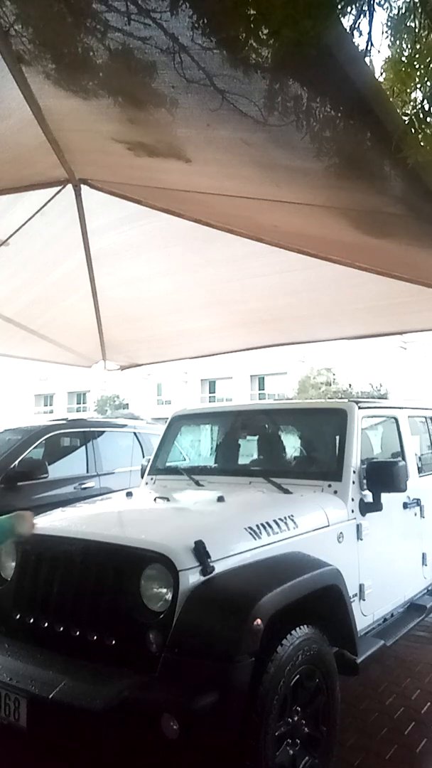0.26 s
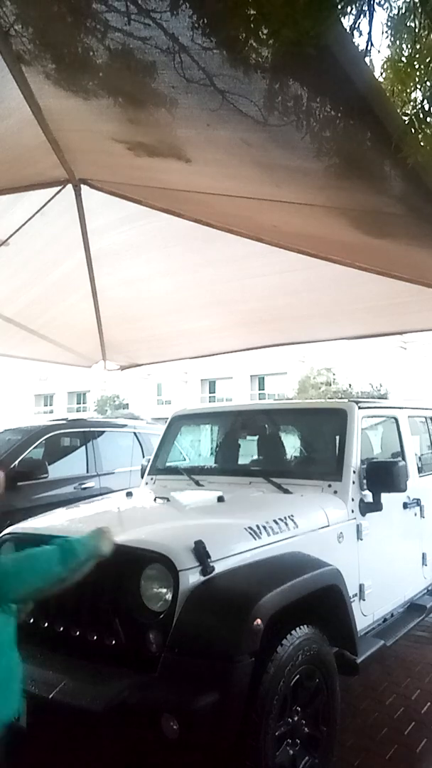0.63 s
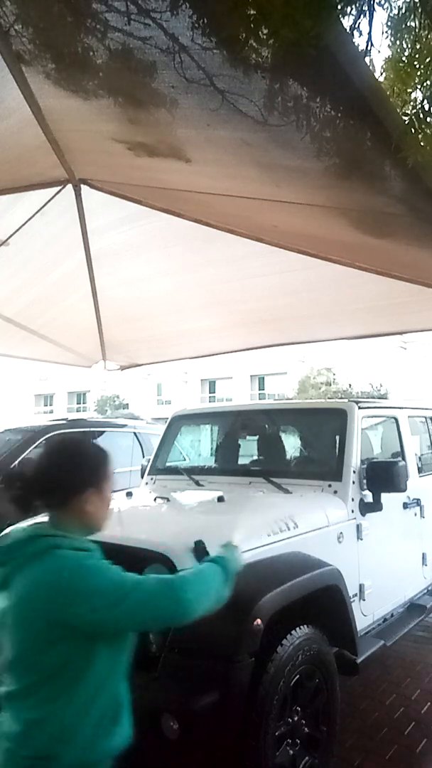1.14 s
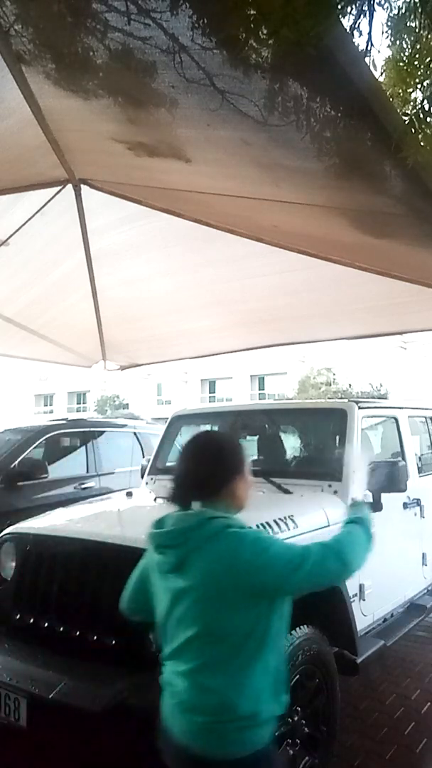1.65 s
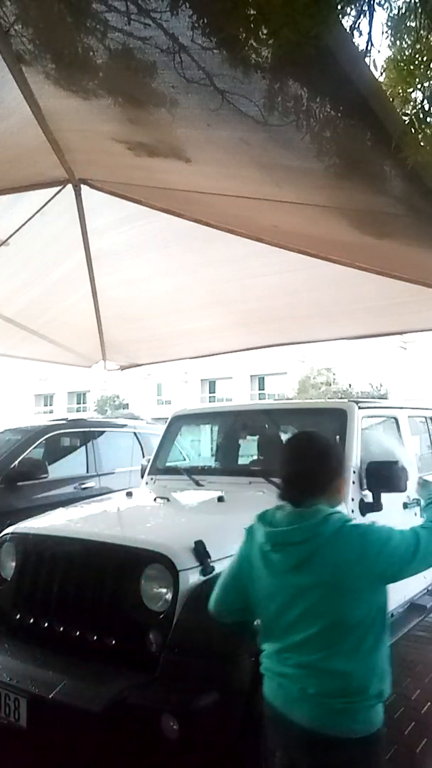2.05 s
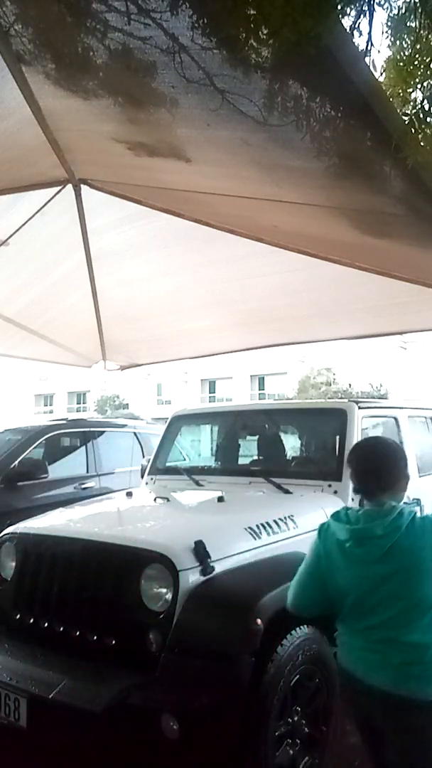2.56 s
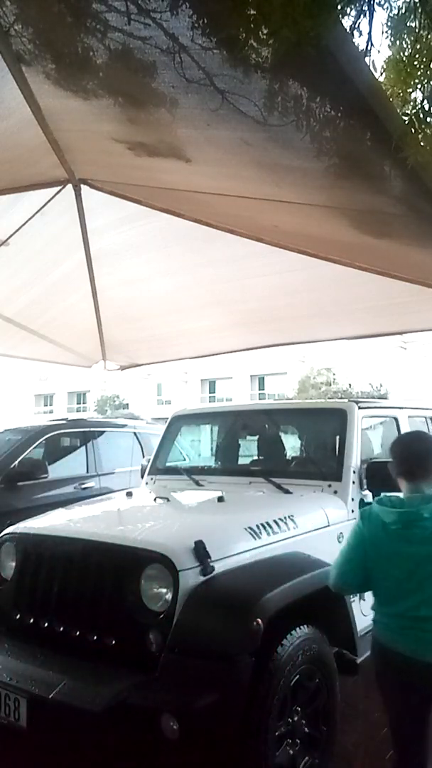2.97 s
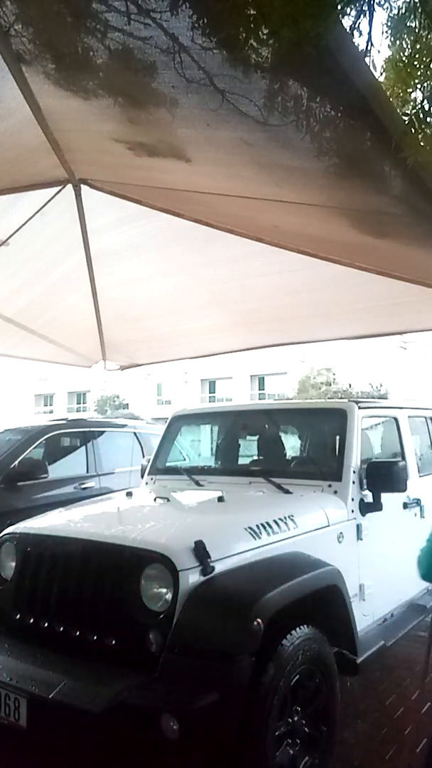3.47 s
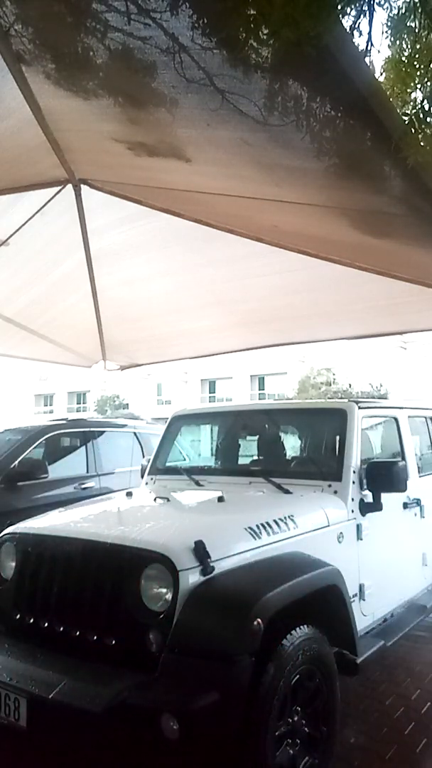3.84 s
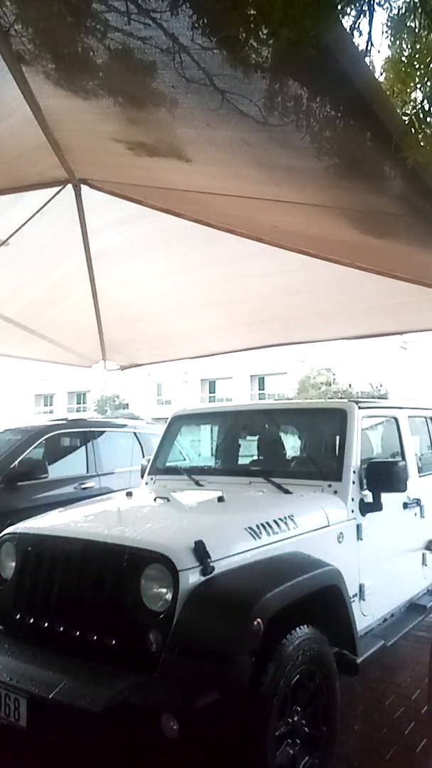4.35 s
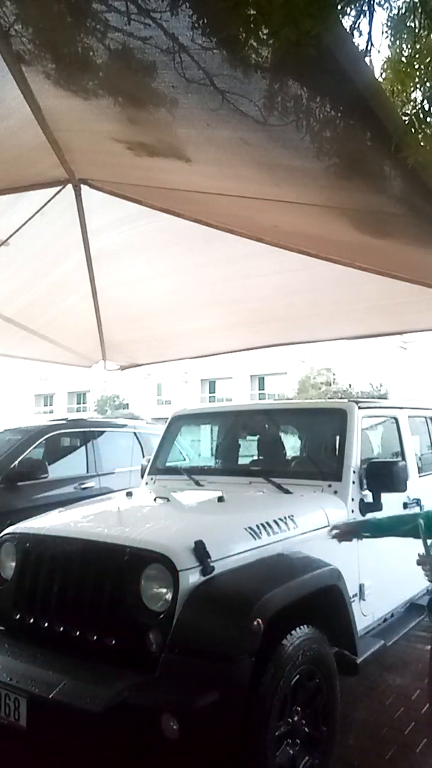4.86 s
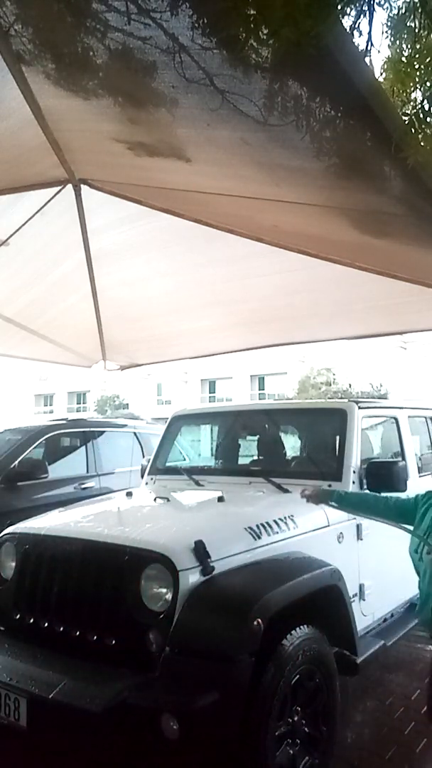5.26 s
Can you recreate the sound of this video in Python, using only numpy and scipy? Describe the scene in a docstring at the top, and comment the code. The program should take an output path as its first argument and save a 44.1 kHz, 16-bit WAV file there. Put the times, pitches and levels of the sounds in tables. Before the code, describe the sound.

Thin, crisp water spray crackles over car bodywork under a canopy, swelling and dipping, then drums the panels and thins to sparse drips over soft traffic.

```python
"""Hosing a parked car

A hose nozzle sweeps over a car under a canopy, a few metres from a phone with two microphone ports.
Shaped noise and short decaying tones make fine drops patter, coarse water slap and the nozzle hiss and spit.
Fat drops crack and ring, trapped bubbles gurgle, and the jet's core drums the panels in noise bursts.
Traffic noise hums behind. The ports share the bass; the right one hears later and brighter."""
import sys
import numpy as np
from scipy import signal
from scipy.fft import rfft, irfft
from scipy.io import wavfile
from scipy.ndimage import uniform_filter1d

SR = 44100
rng = np.random.default_rng(int(sys.argv[2]) if len(sys.argv) > 2 else 0)


def master(y):
    """Save y as 16-bit WAV."""
    cut = np.clip(np.atleast_2d(y).T, -1, 1)
    pcm = np.round(cut * 32767)  # scale
    wavfile.write(sys.argv[1], SR, pcm.astype(np.int16))


N = 242991
HZ = np.maximum(np.arange(N // 2 + 1) * SR / N, 1)  # frequency of every spectral bin
FRONT_S = 0.008  # lag of rising levels


def undb(db):
    """Logarithmic level: amplitude gain of a level in dB."""
    return 10 ** (np.asarray(db) / 20)


def along_hz(table):
    """Logarithmic pitch scale: a (frequency, value) table interpolated at every bin."""
    hz, value = np.transpose(table)
    return np.interp(np.log(HZ), np.log(hz), value)


def colour(x, table):
    """Linear filtering: weight the spectrum, then bring the rms to 1."""
    y = irfft(rfft(x) * undb(along_hz(table)), N)
    return y / np.sqrt(np.mean(y ** 2))


# Correlation of the sound at the two ports: (frequency [Hz], correlation [0-1])
PORT_CORRELATION = [(60, 0.99), (500, 1), (750, 0.7), (1100, 0.01), (2000, 0.26), (3500, 0.03), (6500, 0),
                    (10000, 0)]


def noise_pair():
    """Spatial coherence: noise at both ports, alike in the bass and nearly unrelated in the treble."""
    alike = np.clip(along_hz(PORT_CORRELATION), 0, 1)
    mid, side = rfft(rng.standard_normal((2, N)))
    opposed_side = np.sqrt(1 - alike) * side * np.array([[1], [-1]])
    return irfft((np.sqrt(1 + alike) * mid + opposed_side) / np.sqrt(2), N)


def walk(rate):
    """Slow random modulation: levels held 1 / rate s and smoothed twice; spread near 1."""
    hold = int(SR / rate)
    steps = np.repeat(rng.standard_normal(N // hold + 1), hold)
    return 1.3 * uniform_filter1d(uniform_filter1d(steps, hold), hold)[:N]


def decay(x, t60):
    """Exponential decay: every impulse rises at once and falls 60 dB in t60 s."""
    pole = np.exp(-np.log(1000) / (max(t60, 1e-4) * SR))
    return signal.lfilter([1], [1, -pole], x)


def drops(rate, spread_db, t60):
    """Random arrivals: envelope of landing drops, many small and a few large; rms 1."""
    lands = rng.random(N) < rate / SR
    size = np.minimum(rng.exponential(size=N), 5)
    env = decay(lands * undb(spread_db * size), t60)
    return env / np.sqrt(np.mean(env ** 2))


def plinks(rate, lo_hz, hi_hz, cycles, spread_db):
    """Damped oscillation: drops ring for some cycles and glide up, the same at both ports; rms 1."""
    at, pitch, size = rng.random((int(rate * N / SR), 3)).T
    hz = lo_hz * (hi_hz / lo_hz) ** pitch[:, None]
    k = np.arange(int(4 * cycles * SR / lo_hz))
    turns = hz * k / SR
    tone = np.sin(2 * np.pi * turns * (1 + 0.0096 * turns / cycles))
    ring = np.minimum(turns, 1) * np.exp(-turns / cycles) * tone
    ring = ring * undb(-spread_db * np.log(np.maximum(size, .01)))[:, None]
    samples = (at * N).astype(int)[:, None] + k
    out = np.bincount(samples.ravel(), ring.ravel(), N + len(k))[:N]
    return out / np.sqrt(np.mean(out ** 2))


def curve(table):
    """Time-varying level: every column at every sample; rises lag by FRONT_S, falls do not."""
    s, *db = np.transpose(table)
    t = np.arange(N) / SR
    return [np.minimum(np.interp(t, s, c), np.interp(t - FRONT_S, s, c)) for c in db]


# Water landing on the car as the hose swings, before each part's gain: (time [s], level [dB])
LANDING_WATER = [(0.0, -54.5), (0.04, -53), (0.09, -53), (0.26, -54), (0.28, -56), (0.29, -48),
                 (0.32, -48.5), (0.37, -44.5), (0.66, -50), (0.71, -43.5), (0.78, -51.5), (0.92, -44.5),
                 (1.44, -48), (1.5, -44), (1.58, -45.5), (1.6, -41.5), (1.72, -51), (1.75, -48),
                 (1.9, -51.5), (1.99, -44), (2.06, -47.5), (2.1, -45.5), (2.2, -47.5), (2.23, -49),
                 (2.255, -45), (2.29, -46.5), (2.33, -45), (2.38, -47.5), (2.46, -39.5), (2.7, -53.5),
                 (2.74, -48.5), (2.77, -45), (2.79, -48.5), (2.82, -52.5), (2.9, -52), (2.925, -47.5),
                 (2.96, -49.5), (2.98, -48.5), (3.1, -53.5), (3.125, -61), (3.14, -51), (3.18, -51.5),
                 (3.31, -57.5), (3.38, -42), (3.56, -45), (3.65, -50), (3.68, -40.5), (3.78, -42),
                 (3.87, -49.5), (3.96, -41.5), (4.07, -42), (4.25, -53.5), (4.269, -56), (4.277, -48),
                 (4.3, -52.5), (4.36, -58.5), (4.39, -43.5), (4.42, -49.5), (4.47, -45), (4.5, -52.5),
                 (4.6, -44), (4.64, -52.5), (4.73, -47), (4.79, -59), (4.96, -65), (5.02, -52.5),
                 (5.08, -58.5), (5.17, -58.5), (5.19, -54.5), (5.29, -58), (5.39, -52.5), (5.45, -60),
                 (5.51, -58)]
# Make-up of the spray against that level:
# (time [s], mist and nozzle [dB], coarse water [dB], slosh [dB], ringing drops [dB])
MAKE_UP = [(0, 1, 8, -2, -7), (.12, 0.5, 4, 6.5, -7), (.3, 0, 3, -2, -9), (.75, 0, 2, 3, 0.5),
           (.95, 1.5, 0, 0, 0.5), (1.25, 1.5, 2.5, 5.5, 2.5), (1.45, 6.5, -4.5, 1, -6),
           (1.7, 2, 2, 2.5, -18), (1.9, 1, -4.5, -1.5, -5), (2.3, -0.5, 3, -8, -7), (2.5, 0.5, 1, 1, -2),
           (2.85, 2, -1.5, 4.5, -16), (3.2, 3, -2.5, -0.5, -13), (3.45, 3, -13, 7, -17),
           (3.6, 1.5, -6.5, -1, -21), (4.1, 0.5, 5, 5.5, -19), (4.3, 1.5, 3, -3, -1), (4.55, -2, 7.5, 4, 2),
           (4.7, -1.5, 0, -1, 0.5), (5.0, -1.5, 8.5, 3.5, 3), (5.3, -1, -0.5, 1, -5), (5.51, -5, 16, 2, 5)]
# Noise spectra of fine drops, coarse water, heavy water, mist and nozzle hiss:
# each (frequency [Hz], relative level [dB])
PATTER = [(3000, -78), (4500, -18.5), (5600, -4.5), (6400, -1.5), (7200, -1.5), (8600, 1), (10000, -5.5),
          (11500, -69), (13500, -51)]
SLAP = [(2400, -11), (3200, -3), (3800, 2.5), (4800, 3), (5600, -2), (7000, -39)]
SLOSH = [(1200, -7.5), (1800, 3.5), (2200, 2), (2650, 3), (3100, 4), (4000, -41)]
MIST = [(8500, -37), (10200, 2), (11000, -2), (12500, -4), (13700, -7), (14400, -8.5)]
NOZZLE = [(13300, -22), (14000, 12.5), (14400, 6), (14800, 13), (15200, 17.5), (15600, 9), (16500, -26)]
MEAN_DB = -46  # landing level about which the parts follow
MIST_FOLLOWS, SLAP_FOLLOWS, SLOSH_FOLLOWS = 0.98, 0.94, 0.5  # dB per dB of landing water
RING_SPREAD_DB, DROP_SPREAD_DB = 3.5, 5.5


def spray():
    """Shot noise: five hissing parts shaken by the same drops and spurts, with ringing drops among them."""
    (water,), (fine, coarse, heavy, ringing) = curve(LANDING_WATER), curve(MAKE_UP)
    swing = water - MEAN_DB
    patter, ring = undb(water), undb(water + ringing)
    mist = undb(MEAN_DB + MIST_FOLLOWS * swing + fine)
    slap = undb(MEAN_DB + SLAP_FOLLOWS * swing + coarse)
    slosh = undb(MEAN_DB + SLOSH_FOLLOWS * swing + heavy)
    ticks = drops(rate=1100, spread_db=2.2, t60=0.012)
    spurts = drops(rate=70, spread_db=0.5, t60=0.08)
    # (spectrum, level curve, gain [dB], tick share, spurt share, flicker [dB])
    parts = [(PATTER, patter, 4.0, .6, .25, .6),
             (SLAP, slap, -9.0, .5, .25, .8),
             (SLOSH, slosh, -17.5, .5, .25, 1.5),
             (MIST, mist, -2.5, .4, .1, 1.2),
             (NOZZLE, mist, -1.5, .4, .1, 1.2)]
    out = 0
    for table, level, gain_db, tick, spurt, flicker_db in parts:
        grain = (1 + tick * ticks) * (1 + spurt * spurts)
        flicker = undb(gain_db + flicker_db * walk(14))
        out = out + level * flicker * colour(grain * noise_pair(), table)
    out = out + ring * plinks(rate=510, lo_hz=5990, hi_hz=6790, cycles=10.6, spread_db=RING_SPREAD_DB)
    # (level curve, gain [dB], drops per s, lowest [Hz], highest [Hz], ring [cycles])
    short_drops = [(patter, -3.5, 1500, 6580, 10660, 2.1),
                   (mist, -10.0, 1300, 10500, 15100, 2.7),
                   (slosh, -29.0, 260, 1690, 4670, 2.1),
                   (slap, -15.0, 810, 3060, 5460, 2.7)]
    for level, gain_db, rate, lo_hz, hi_hz, cycles in short_drops:
        out = out + level * undb(gain_db) * plinks(rate, lo_hz, hi_hz, cycles, DROP_SPREAD_DB)
    return out


# Spectrum of the far road: (frequency [Hz], relative level [dB])
TRAFFIC = [(25, -40), (45, -13.5), (70, -3), (100, 0.5), (170, 0.5), (260, -1.5), (500, -3), (720, -2.5),
           (950, -6.5), (1500, -14.5), (2500, -24.5), (6000, -20), (15000, -36)]
# Slow swell of the traffic: (time [s], level [dB])
ROAD = [(0, -48.5), (.2, -51), (1, -50.5), (1.9, -52), (3.4, -50.5), (4.2, -51), (5.51, -52.5)]
# Distant machinery; the skirts lie 40 dB down at three widths: (frequency [Hz], mean level [dB], width [Hz])
HUM = [(95.7, -64.5, 8), (1428, -79.5, 6.9)]


def traffic():
    """Superposition of incoherent sources: broad road rumble that swells gently, with faint wavering hums."""
    hums = 0
    for hz, db, width in HUM:
        narrow = [(hz - 3 * width, -40), (hz, 0), (hz + 3 * width, -40)]
        hums = hums + undb(db + 1.4 * walk(3.1)) * colour(rng.standard_normal(N), narrow)
    return undb(curve(ROAD)[0]) * colour(noise_pair(), TRAFFIC) + hums


# The fattest drops and slugs of water:
# (time [s], overall gain [dB], starting ring [Hz], spatter relative to overall gain [dB])
SPLATS = [(0.034, -32, 6400, -9), (0.043, -26.5, 6500, -10), (0.152, -37, 6700, -2),
          (0.2055, -28, 7340, -9), (0.247, -24.5, 7800, -8), (0.2805, -34, 8500, -20),
          (0.286, -18, 8450, -13), (0.2882, -27, 9000, -14), (0.2937, -29, 8040, -20),
          (0.2946, -20, 8400, -14), (0.2953, -25, 9000, -20), (0.4788, -21, 8900, -16),
          (0.5056, -20.5, 8650, -24.5), (0.56, -29, 8200, -8), (0.609, -27.5, 8600, -4),
          (0.6669, -24, 7340, -10), (0.921, -23.5, 6060, -6), (0.945, -21, 6500, -9),
          (0.817, -32, 6000, -10), (0.847, -30, 8500, -8), (0.876, -29, 7050, -10), (0.89, -30, 7500, -16),
          (0.897, -22, 7560, -6), (0.958, -22, 6600, -10), (1.0234, -27, 6170, -16),
          (1.031, -23.5, 5970, -5), (1.049, -25, 7000, -18), (1.177, -30, 6520, -9), (1.213, -26, 6200, -2),
          (1.392, -23, 8850, -9), (1.489, -20, 8600, -12), (1.594, -25, 6640, -8), (1.611, -26, 6600, -12),
          (1.618, -25, 7000, -16), (1.7447, -24.5, 8380, -13), (1.8655, -29.5, 6240, -6),
          (1.9503, -28.5, 6960, -4), (1.994, -26, 8700, -3.5), (2.024, -29, 6200, -12),
          (2.095, -28, 6500, 0.5), (2.1415, -28, 7600, -12), (2.18, -28, 7000, -18),
          (2.186, -24, 8890, -12), (2.2194, -29, 7000, -20), (2.2421, -28.5, 6480, -2.5),
          (2.278, -28, 6900, -14), (2.3125, -26, 7000, -14), (2.3464, -30, 6550, -14),
          (2.4252, -32, 8080, -12), (2.4478, -30, 6200, 2.5), (2.461, -28, 6450, -16),
          (2.467, -26, 6460, -16), (2.7435, -36, 9000, -13), (2.7807, -26.5, 6700, -3),
          (2.9081, -33, 8200, -2), (2.948, -30, 7690, -16), (2.9744, -30.5, 8000, -0.5),
          (3.003, -31, 8000, -20), (3.132, -26.5, 7400, -11), (3.359, -29, 8900, -7),
          (3.536, -23, 8000, -12), (3.6704, -24, 7990, -12), (3.764, -19, 7440, -15),
          (3.8114, -24, 6900, -8), (4.077, -35, 9200, 8), (4.177, -23, 7360, -14), (4.1987, -25, 7200, -13),
          (4.282, -18, 7460, -25), (4.2897, -31, 7800, -14), (4.2915, -31, 7600, -14),
          (4.2957, -29, 7060, -8), (4.3045, -29, 9000, -20), (4.3798, -22.5, 7000, -5.5),
          (4.3865, -29, 5200, -7), (4.429, -26, 6300, -12), (4.4695, -25, 6300, -12),
          (4.542, -25.5, 7400, -6), (4.696, -27.5, 6500, -10), (4.7272, -17.5, 6300, -30),
          (4.729, -29, 7000, -17), (4.751, -30, 6300, -10), (4.801, -39, 6800, -6),
          (4.888, -38.5, 6600, -14), (4.928, -35, 7400, -9), (4.989, -40, 5270, 2), (4.997, -36, 5300, 2),
          (5.019, -27.5, 7000, -15), (5.1858, -30, 6250, -2.5), (5.473, -36.5, 8100, -4)]
CRACK_S, RING_S = .00015, .00055  # time constants; the ring's holds at RING_HZ
RING_HZ, RING_LAW = 7000, 2.5  # lower drops ring longer: time goes as pitch to minus this power
CRACK_DB, RISE_CYCLES = -12, 1.3
SPATTER_T60_S = .055


def splats():
    """Impact and damped resonance: a bright crack, a few cycles of ring in the wet paint, a short spatter."""
    out, t = np.zeros((2, N + 4096)), np.arange(4096) / SR
    high = signal.butter(4, 4700, "high", fs=SR, output="sos")
    bright = signal.butter(2, 9000, "high", fs=SR, output="sos")
    for s, db, hz, spatter_db in SPLATS:
        noise = rng.standard_normal((3, len(t)))
        crack = undb(CRACK_DB) * np.exp(-t / CRACK_S) * signal.sosfilt(bright, noise[0])
        fade = np.exp(-t / RING_S * (hz / RING_HZ) ** RING_LAW)
        rising_tone = np.sin(2 * np.pi * hz * t * (1 + 30 * t))
        ring = np.minimum(hz * t / RISE_CYCLES, 1) * fade * rising_tone
        band = signal.butter(2, [hz * .6, hz * 1.45], "band", fs=SR, output="sos")
        burst = 0.12 * fade + undb(spatter_db) * np.exp(-np.log(1000) * t / SPATTER_T60_S)
        spatter = burst * signal.sosfilt(band, noise[1:])  # separate noise at each port
        splat = signal.sosfilt(high, crack + 1.36 * ring + spatter)
        start = int(s * SR)
        out[:, start:start + len(t)] += undb(db) * splat
    return out[:, :N]


# Air spitting through the nozzle: (time [s], gain of the hiss before its pop [dB])
SPITS = [(0.288, -42), (0.468, -57), (0.605, -39.5), (1.595, -42), (2.743, -41), (2.876, -40), (2.883, -41),
         (3.524, -38), (3.508, -44), (3.5306, -36), (4.078, -44), (0.2945, -44), (3.132, -48), (5.145, -50)]
SPIT_T60_S, SPIT_MIST_DB = 0.042, -8.5
POP_T60_S, POP_DB = .007, 9  # each spit opens with a sharp pop


def spits():
    """Turbulent jet noise: short bright bursts of hiss when air leaves the nozzle."""
    s, db = np.transpose(SPITS)
    pops = np.bincount((s * SR).astype(int), undb(db), N)
    burst = decay(pops, SPIT_T60_S) + undb(POP_DB) * decay(pops, POP_T60_S)
    hiss = colour(noise_pair(), NOZZLE) + undb(SPIT_MIST_DB) * colour(noise_pair(), MIST)
    return burst * hiss


# Clusters of bubbles: (time [s], gain before each bubble's own offset [dB], central bubble pitch [Hz])
GURGLES = [(2.042, -36, 3460), (2.158, -30, 3700), (2.243, -43, 3800), (2.4508, -34, 3580),
           (4.012, -41, 3860), (4.198, -33, 4000), (4.221, -47, 3180), (4.243, -39, 4000),
           (4.748, -33, 2680), (4.966, -47, 4700), (5.1865, -37, 4070)]
BUBBLES = 5  # in one gurgle
BUBBLE_SPREAD = .25  # pitch scatter as a share
BUBBLE_GAP_S, BUBBLE_RING_S = .0012, .0007  # nominal gap, decay time constant


def gurgles():
    """Bubble resonance: air trapped in running water rings as a quick cluster of scattered pitches."""
    out, t = np.zeros(N + 4096), np.arange(1024) / SR
    for s, db, hz in GURGLES:
        for k, (pitch, size) in enumerate(rng.uniform(-1, 1, (BUBBLES, 2))):
            at = int((s + k * BUBBLE_GAP_S * (1 + .5 * size)) * SR)
            bubble_hz = hz * (1 + BUBBLE_SPREAD * pitch)
            rising_tone = np.sin(2 * np.pi * bubble_hz * t * (1 + 10 * t))
            bubble = np.minimum(hz * t, 1) * np.exp(-t / BUBBLE_RING_S) * rising_tone
            out[at:at + len(t)] += undb(db - 2 * k + 2 * size) * bubble
    return out[:N]


# The jet's core crossing a panel: (time of peak [s], rise [s], fall [s],
# rattle gain [dB], boom gain [dB], slosh gain [dB], thud gain [dB])
CROSSINGS = [(3.44, 0.1, 0.11, -46.5, -40, -46, -58), (3.73, 0.1, 0.061, -57.5, -47, -57.5, -61),
             (4.05, 0.2, 0.12, -61, -45.5, -65, -54), (4.19, 0.032, .04, -68, -59, -67, -49),
             (4.384, 0.008, 0.027, -66, -56, -41.5, -55), (4.41, 0.051, 0.092, -69, -44, -57.5, -49),
             (4.56, 0.052, 0.064, -70, -54, -58, -72), (4.752, 0.028, 0.038, -71, -71, -53.5, -70)]
SWELL_DB = 18  # a crossing rises and falls by this much in its rise and fall time
SWELL_SHAPE = 1.72  # higher is a flatter top with steeper sides


def crossing(index, late=0):
    """Amplitude envelope: gain of one layer over all crossings, a rounded rise and fall."""
    out, grid = 0, np.arange(0, N / SR, .001)
    for row in CROSSINGS:
        peak, rise, fall = row[:3]
        delay = late * fall
        t = grid - peak - delay
        span = np.where(t < 0, rise + delay, fall)
        out = out + undb(row[index] - SWELL_DB * np.abs(t / span) ** SWELL_SHAPE)
    return np.interp(np.arange(N) / SR, grid, out)


# Spectra of the panel rattle, the low boom and the car body under the panels:
# each (frequency [Hz], relative level [dB])
PANEL = [(700, -9), (900, 5), (1300, 9), (1500, 10.5), (2200, -4), (3000, -30), (4000, -37.5)]
BOOM = [(100, -36), (170, -7), (280, -9.5), (340, 5), (420, -1), (510, 4.5), (620, -3.5), (730, -3.5),
        (850, -21)]
THUD = [(50, -31), (80, 1.5), (130, 2.5), (200, -4), (280, -20.5)]
BOOM_LATE, THUD_LATE = 0.21, 0.36  # the low sounds peak later, in fall times
PANEL_ALIKE, CORE_SLAP_DB = 1.3, -0.5  # weight of noise common to both ports; slap against slosh


def drumming():
    """Forced vibration: the jet's core knocks the sheet metal in a dense roll and sloshes off it."""
    knocks = 1 + 0.45 * drops(rate=450, spread_db=3.5, t60=0.02)

    def knocked(table):
        """Common excitation: noise largely shared by the ports, pulsed by the knocks and coloured."""
        return colour(knocks * (PANEL_ALIKE * rng.standard_normal(N) + noise_pair()), table)

    rattle = crossing(index=3) * knocked(PANEL)
    boom = crossing(index=4, late=BOOM_LATE) * knocked(BOOM)
    thud = crossing(index=6, late=THUD_LATE) * knocked(THUD)
    wash = crossing(index=5) * (knocked(SLOSH) + undb(CORE_SLAP_DB) * knocked(SLAP))
    return rattle + boom + thud + wash


# Random wavering of narrow bands: (frequency [Hz], depth as standard deviation [dB])
RIPPLE = [(150, 0), (500, 1.5), (1000, 1), (2500, 4), (4500, 3.5), (7000, 2), (14000, 2)]
RIPPLE_WIDTH, RIPPLE_HOLD = 2, 7  # smoothing of the patches: bands of 86 Hz, steps of 6 ms


def ripple(x):
    """Narrow-band modulation: small patches of pitch and time grow louder or softer at random."""
    hz, _, z = signal.stft(x, SR, nperseg=512)
    patch = uniform_filter1d(rng.standard_normal(z.shape[1:]), size=RIPPLE_WIDTH, axis=0)
    patch = uniform_filter1d(patch, size=RIPPLE_HOLD, axis=1)
    at, depth_db = np.transpose(RIPPLE)
    depth = np.interp(np.log(hz + 1), np.log(at), depth_db)[:, None]
    gain = undb(depth * patch / patch.std())
    gain = gain / np.sqrt(np.mean(gain ** 2, axis=1, keepdims=True))  # keeps each band's mean power gain at 1
    return signal.istft(z * gain, SR, nperseg=512)[1][:, :N]


def scene():
    """Superposition: all sources add at the two ports; the steady layers and the drumming waver."""
    return ripple(spray() + drumming() + traffic()) + splats() + spits() + gurgles()


# Response of the left port: (frequency [Hz], gain [dB])
LEFT_PORT = [(60, -1.5), (400, -2.5), (2400, -3.5), (4000, -5), (6000, -5), (7800, -13), (9200, -7),
             (11000, -16.5), (13500, -31), (15000, -23)]
RIGHT_LAG_S = 0.000849
TOP_HZ = 15750


def record(dry):
    """Linear response and phase delay: the left port is duller, the right one late; the top is cut."""
    left, right = rfft(dry)
    dull_left = left * undb(along_hz(LEFT_PORT))
    late_right = right * np.exp(-2j * np.pi * HZ * RIGHT_LAG_S)
    ports = irfft([dull_left, late_right], N)
    return signal.sosfilt(signal.ellip(10, .2, 65, TOP_HZ, fs=SR, output="sos"), ports)


dry = scene()
out = record(dry)
master(out)
```